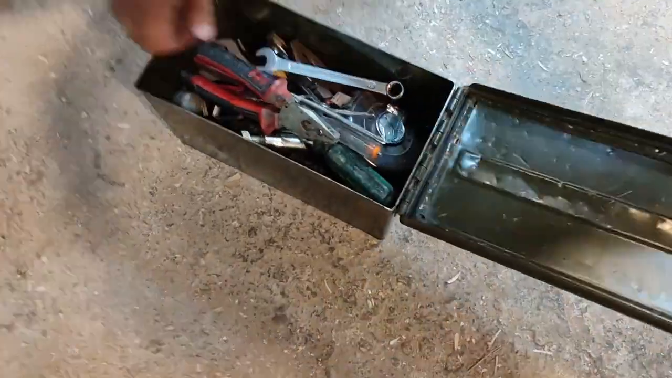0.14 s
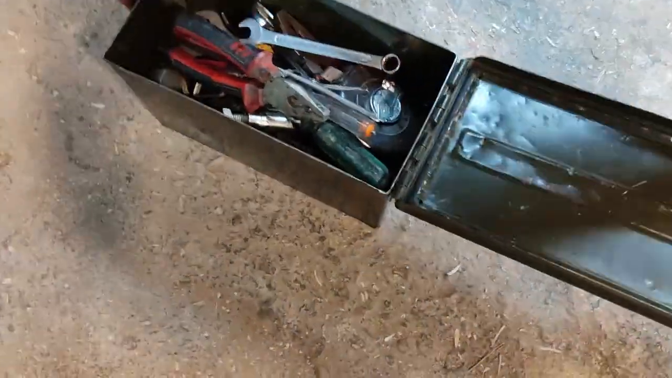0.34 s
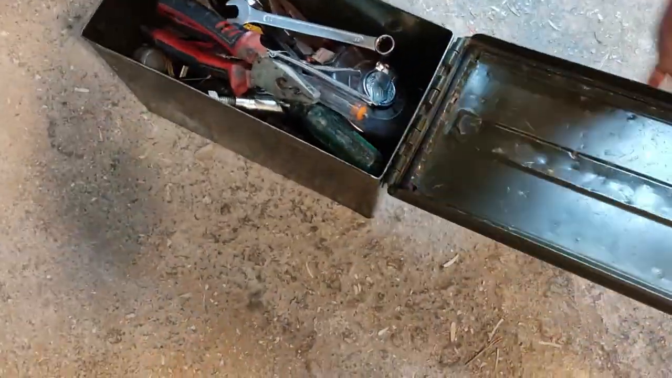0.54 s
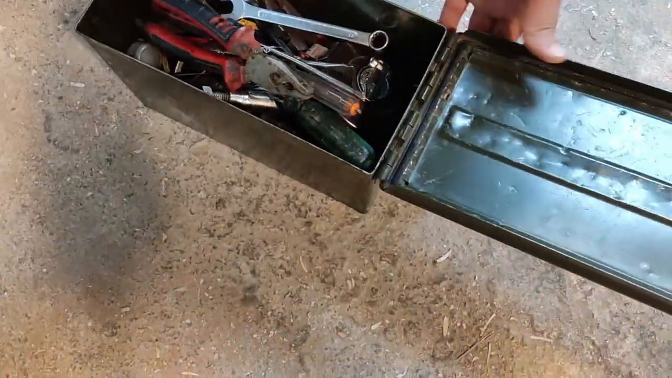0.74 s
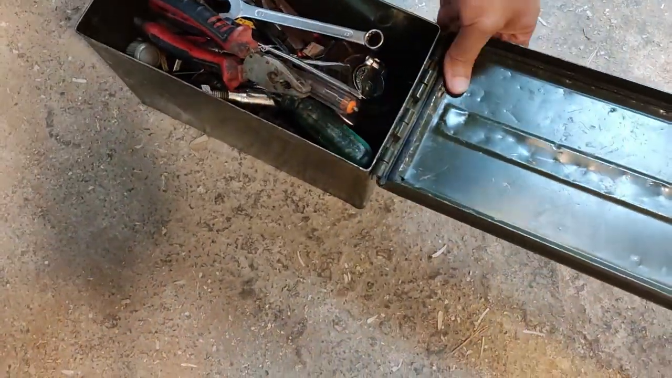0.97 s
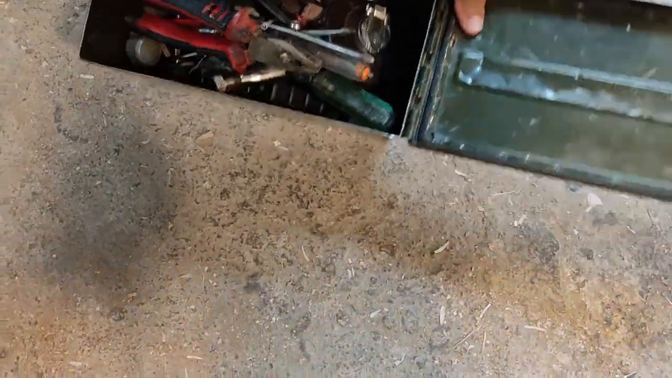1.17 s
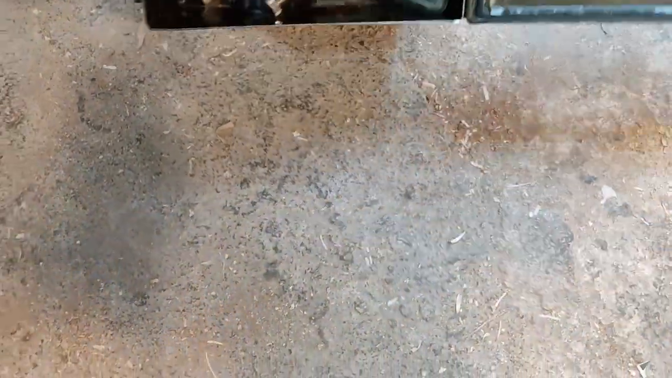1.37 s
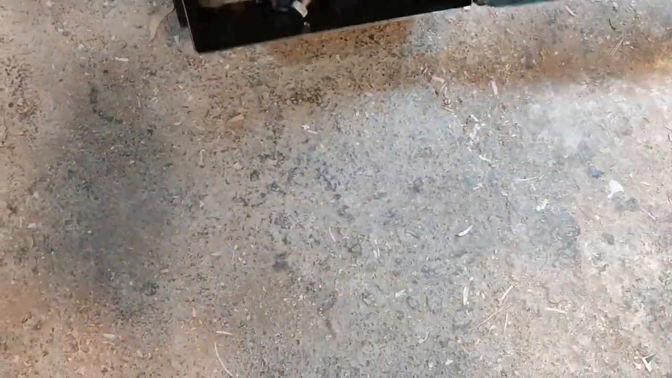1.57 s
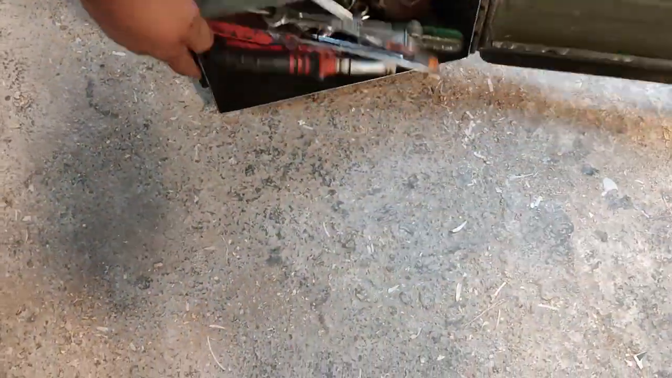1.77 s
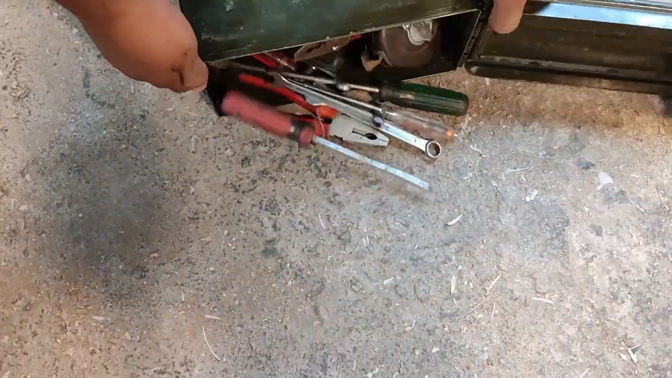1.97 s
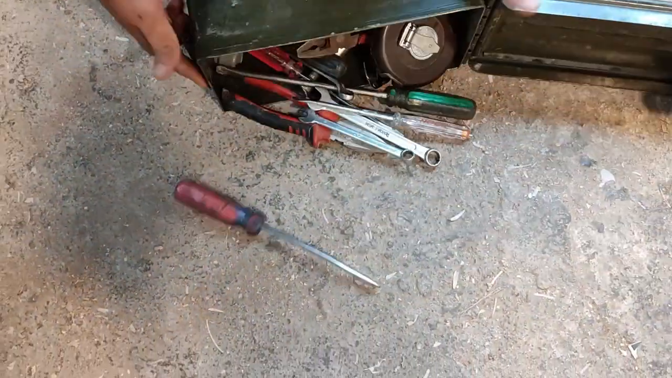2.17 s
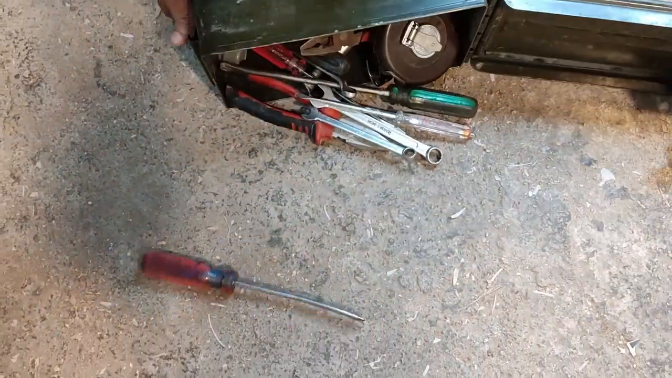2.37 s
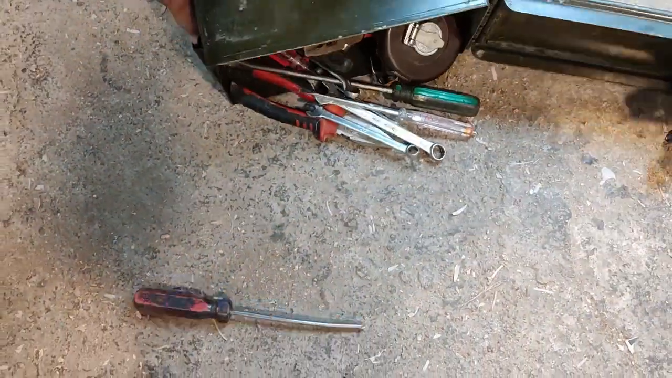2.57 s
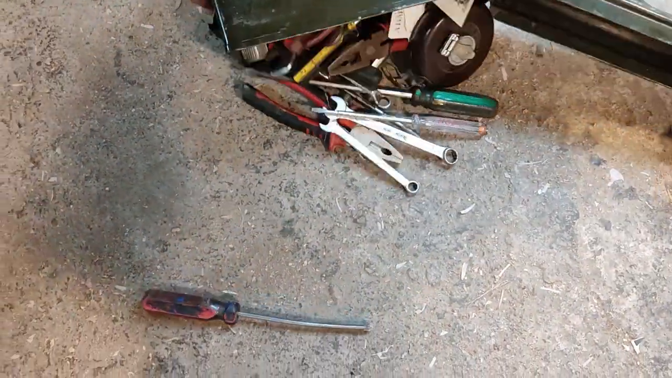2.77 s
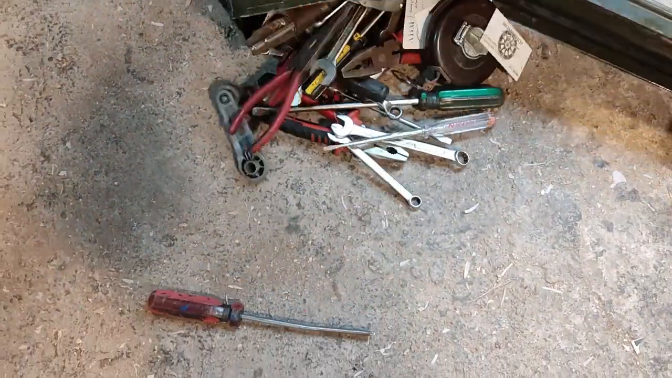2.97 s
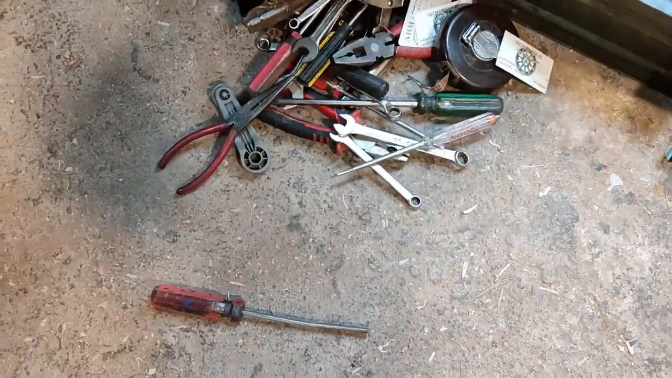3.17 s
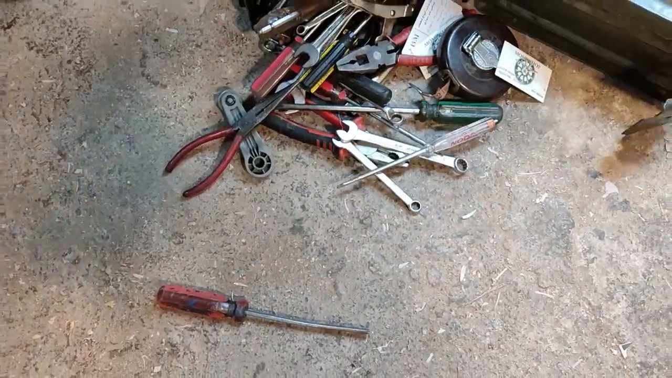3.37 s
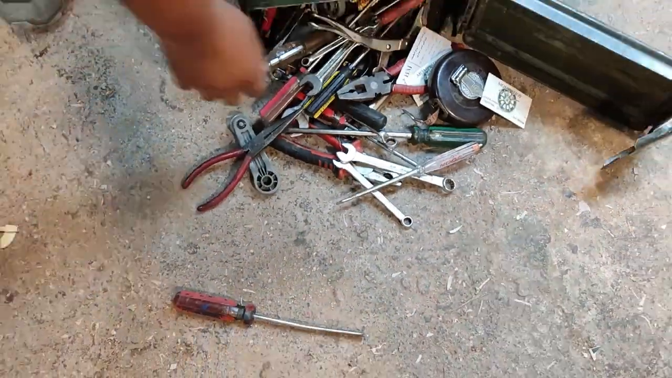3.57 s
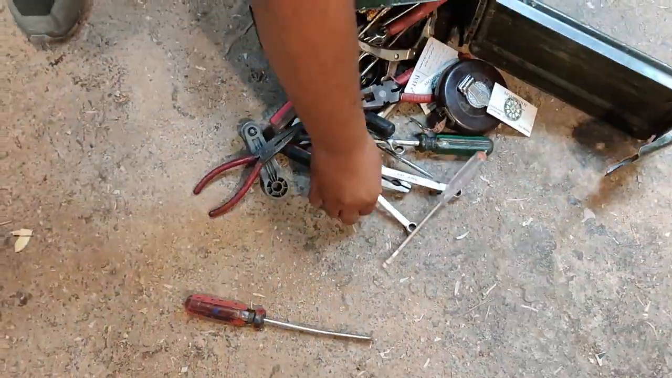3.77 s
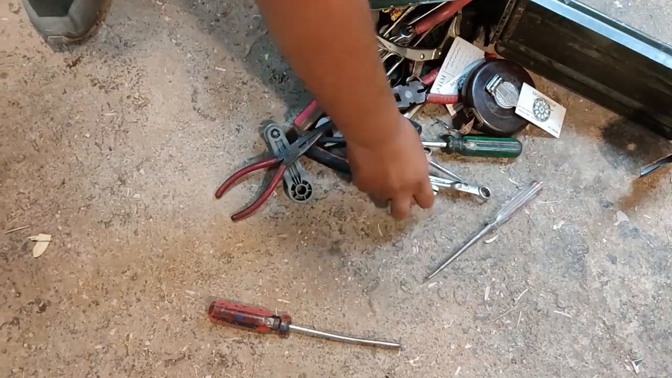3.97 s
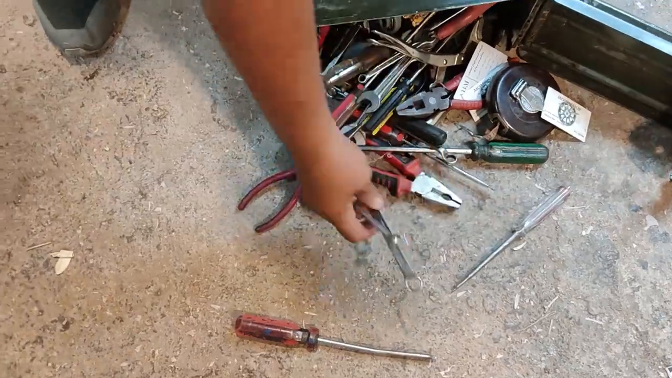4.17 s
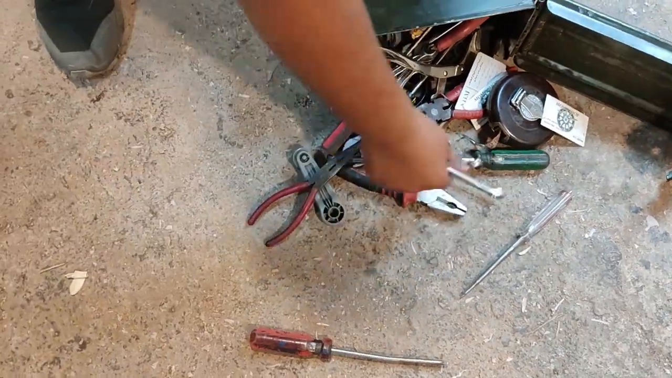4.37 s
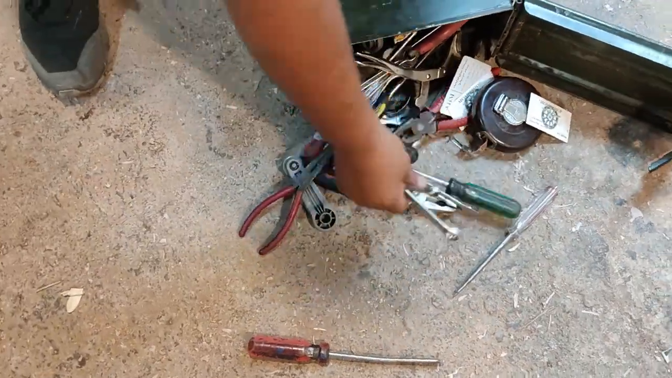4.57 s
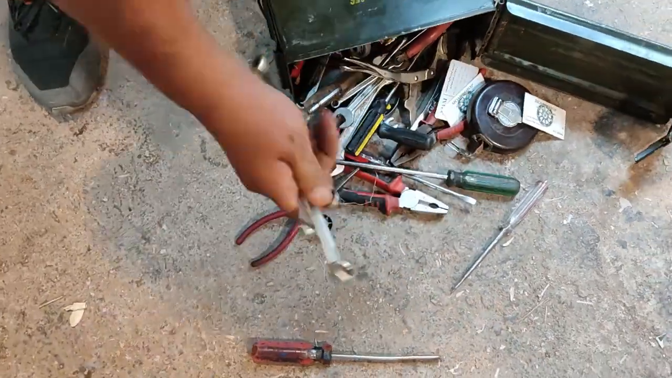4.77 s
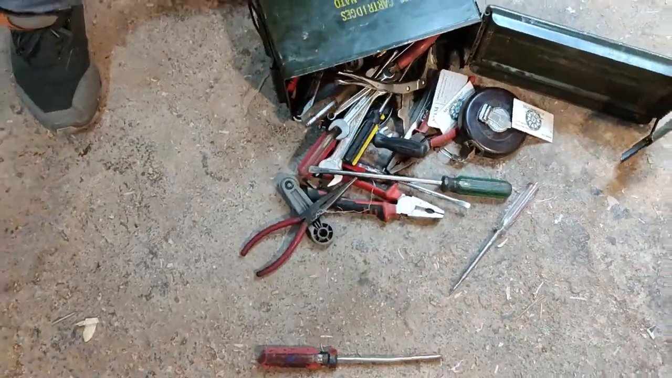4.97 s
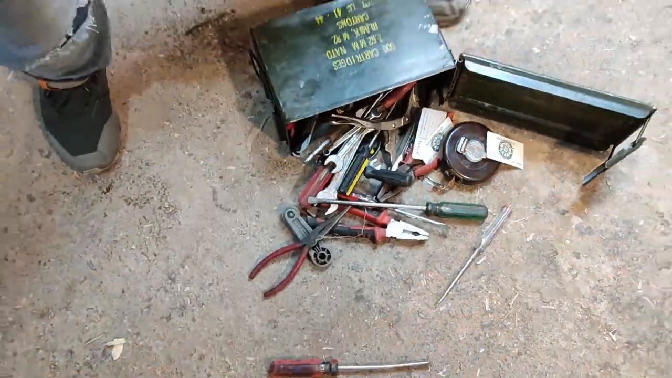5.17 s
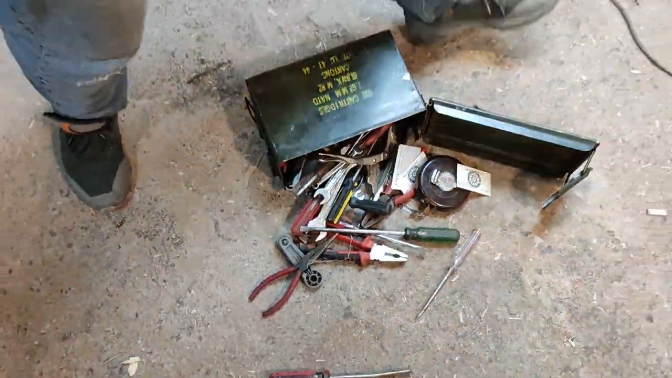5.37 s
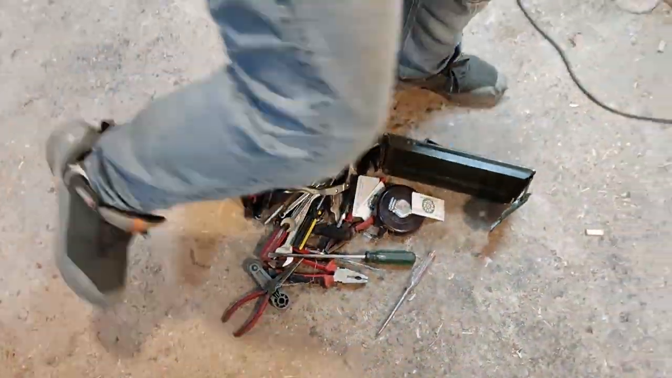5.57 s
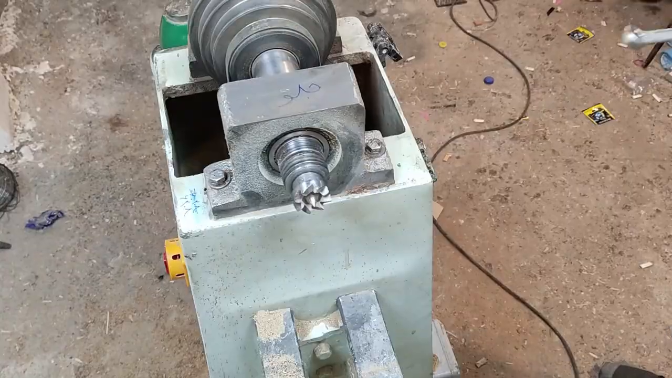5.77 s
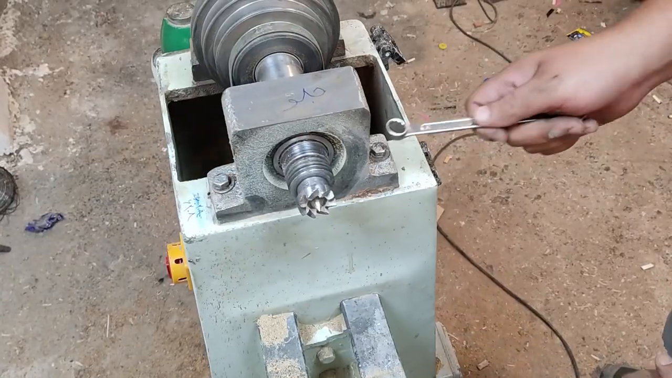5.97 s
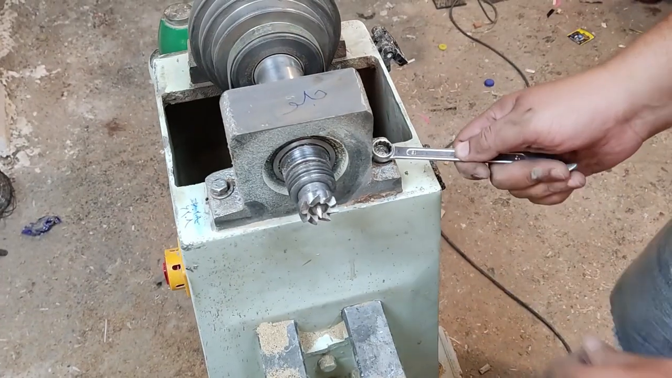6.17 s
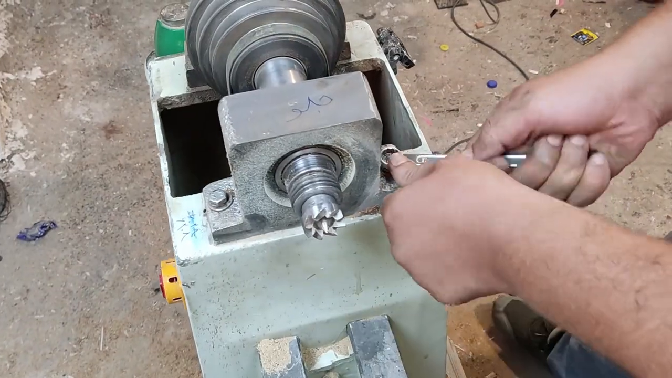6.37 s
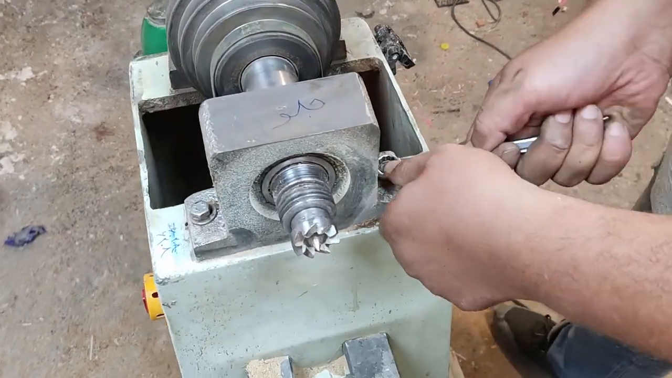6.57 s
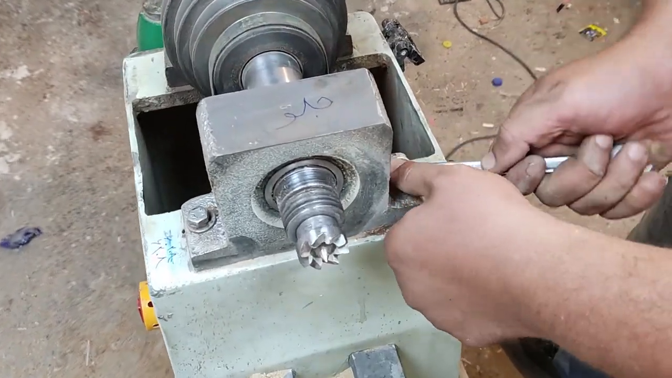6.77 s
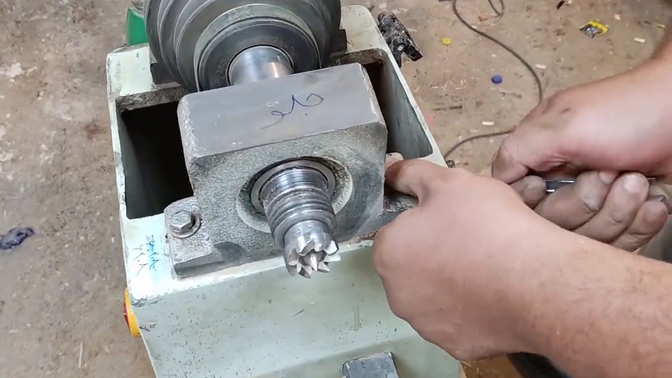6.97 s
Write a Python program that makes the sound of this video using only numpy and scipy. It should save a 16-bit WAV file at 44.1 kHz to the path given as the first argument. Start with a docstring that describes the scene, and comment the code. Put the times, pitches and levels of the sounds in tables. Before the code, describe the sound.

Hand tools are emptied from a sheet-metal box onto a concrete floor, close to the microphone. After a small clank and hollow box bumps comes a loud, dense, high metallic crash, then dull knocks and dragging, a second tumbling burst with low thumps, sparse delicate clinks, a short rummage, and very quiet taps on a machine nut with faint hum.

```python
"""On the concrete floor of a workshop, a steel box of hand tools is tipped out close by.
A spanner drops in, the box is lifted and tilted, wrenches slide out ringing, the rest follows in a heap.
A hand picks through the heap for a spanner, which then taps on a nut of a lathe.
Blows are cracks of noise with dying modes, slides are streams of such blows,
and dull rubbing, hum and air are steady noise and sines."""
import sys
import numpy as np
from scipy import signal
from scipy.fft import rfft, irfft, next_fast_len
from scipy.io import wavfile
from scipy.ndimage import uniform_filter1d

SR = 44100
rng = np.random.default_rng(int(sys.argv[2]) if len(sys.argv) > 2 else 0)


def unload_wav(signal):
    """Save mono or channel-first audio to the path in sys.argv[1] as 16-bit WAV at rate SR, clipped to [-1, 1]."""
    wavfile.write(
        sys.argv[1],
        SR,
        np.round(np.clip(np.atleast_2d(signal).T, -1, 1) * 32767).astype(np.int16),
    )


N = 309582
TIME = np.arange(N) / SR
RING_TIME = TIME[:SR // 2]

# tools jolt together as the box tips (t/s, level/dB)
JOLT = [(1.593, 4.5), (1.607, 12.5), (1.627, 10.5)]
# modes of the jolted tools (f/Hz, level/dB, t60/s)
JOLTED_TOOL_MODES = [(3111, -44, .14), (3757, -40, .15), (4468, -45, .16), (5335, -40, .2),
                     (5385, -38, .24), (6180, -37, .17), (6330, -42, .14), (7267, -36, .2),
                     (8300, -37, .22), (8914, -36, .14), (9679, -36, .16), (11434, -38, .16),
                     (13092, -31, .18), (13770, -44, .16)]
# a wrench hits the lip of the box end first (t/s, level/dB)
END_CLANK = [(1.749, -16)]
# modes that such a blow brings out (f/Hz, level/dB, t60/s)
END_MODES = [(5178, -13, .13), (6384, -17, .12), (6998, -20, .1), (8268, -11, .1), (10895, 0, .22),
             (11810, -10, .14), (11993, -6, .25)]
# another tool falls against the wrenches (t/s, level/dB)
FALLING_TOOL_CLANK = [(1.795, -23)]
# modes of that tool (f/Hz, level/dB, t60/s)
FALLING_TOOL_MODES = [(2885, -11, .12), (3789, -10, .12), (4015, -9, .12), (5351, -8, .14), (6126, 1, .14),
                      (7213, 1, .14), (8494, 0, .12), (9636, 0, .14), (10368, 3, .14), (10658, 0, .12),
                      (12004, 3, .2)]
# large wrenches skid over the concrete (start t/s, rise t/s, fall t/s, force level/dB)
SKID = [(1.76, 0.2, 0.35, 9)]
# the wrenches clank against each other on the way (t/s, level/dB)
WRENCH_CLANKS = [(1.837, 16), (1.864, 10), (1.905, 8), (1.94, 5.5), (1.968, 11), (1.996, 11), (2.036, 18),
                 (2.06, 10.5), (2.1, 3), (2.129, 10), (2.159, 12.5), (2.185, 2.5), (2.222, 7.5)]
# modes of the large wrenches (f/Hz, level/dB, t60/s)
WRENCH_MODES = [(5255, -49, .2), (6153, -57, .2), (6500, -55, .28), (6907, -56, .2), (7214, -57, .14),
                (7893, -39, .28), (8452, -43, .18), (8692, -39, .22), (8807, -49, .18), (9302, -37.5, .17),
                (10348, -44, .14), (10902, -38.5, .22), (11050, -43.5, .26), (11225, -45, .2),
                (11536, -46, .18), (11918, -43, .25), (12009, -44, .22), (12252, -49, .2), (12424, -44, .2),
                (12879, -42, .26), (14131, -45, .09)]
# the last wrench slips free and bounces once (t/s, level/dB)
LAST_BOUNCE = [(2.255, -26.5)]
# modes of the last wrench (f/Hz, level/dB, t60/s)
LAST_WRENCH_MODES = [(5255, -17, .22), (6500, -19, .25), (7892, -4, .24), (8700, -7, .3), (10928, 0, .85),
                     (11048, 1, .27), (11915, -3, .22), (12009, -6, .24), (12890, -9, .22)]
# stereo balance given to the sounds of the box and the spill (f/Hz, left minus right level/dB)
BOX_SIDE = [(300, 1), (4500, -0.5), (7000, -2.5), (9200, -13.5), (10200, 5), (11200, 16), (14000, 2)]


def wrenches():
    """Wrenches skid and clank, their bending modes ringing in the room; the last one rings on without it."""
    ring = ringing(SKID, WRENCH_MODES, per_s=90)
    ring += struck(JOLT, JOLTED_TOOL_MODES, trim_db=0, spread_db=2)
    ring += struck(END_CLANK, END_MODES, trim_db=0, spread_db=1)
    ring += struck(FALLING_TOOL_CLANK, FALLING_TOOL_MODES, trim_db=0, spread_db=1)
    ring += struck(WRENCH_CLANKS, WRENCH_MODES, trim_db=0, spread_db=5)
    heard = room(ring, wet_db=-9, t60=.18)
    heard += struck(LAST_BOUNCE, LAST_WRENCH_MODES, trim_db=0, spread_db=1)
    return tinted(heard, [(5000, 0.29), (14000, -0.66)], BOX_SIDE)


# tools slide down the tilted box in surges (start t/s, rise t/s, fall t/s, level/dB, hardness 0-1)
POUR = [(1.59, 0.027, 0.7, -31.5, 0.53), (1.695, 0.066, 0.38, -43, 1), (1.8, 0.11, 0.13, -28, 0.42),
        (1.95, 0.15, .26, -34.5, 0.82)]
# the tools in the box jingle to rest (start t/s, rise t/s, fall t/s, level/dB, hardness 0-1)
SETTLE = [(0.0036, 0.023, .15, -50.5, 0.91)]
# steel lands on steel inside the box (t/s, level/dB, hardness 0-1)
BOX_BLOWS = [(-0.02, -33.5, 0.7), (0.248, -52, 0.1), (0.4822, -63.5, 0.6), (0.7762, -66, 0.68),
             (1.6065, -25, 0.58), (1.6185, -29.5, .58), (1.6275, -28.5, 0.62), (1.641, -35, .5),
             (1.7205, -39.5, 0.8), (1.7484, -36.5, 0.83), (1.7925, -27.5, 0.5), (1.8365, -29, 0.5),
             (1.879, -30.5, .45), (1.9248, -22, 0.13), (1.939, -26, 0.62), (1.971, -34, 0.7),
             (1.9937, -30.5, 0.67), (2.0334, -39, 0.72), (2.0602, -33, 0.5), (2.1265, -38.5, 0.44)]
# dense ringing of tools within the box (f/Hz, level/dB)
BOX_COLOUR = [(100, -24.5), (220, -7), (340, 3), (600, -3.5), (1250, -5), (2400, -6.5), (3600, -8),
              (4500, -11), (7000, -8.5), (8400, -1), (11200, 0), (13100, -8), (14200, -30.5),
              (15000, -54.5)]


def tools_in_box():
    """Steel strikes steel inside the box, in single blows and in sliding streams of collisions."""
    sound = blows(BOX_BLOWS, BOX_COLOUR, BOX_SIDE, trim_db=[8, -11, 1], t60=.26, crack_db=10, crack_s=.0043)
    sound += clatter(SETTLE, BOX_COLOUR, BOX_SIDE, trim_db=[0, -8, 0], per_s=560,
                     t60=.15, crack_db=-.5, crack_s=.00076, count=2)
    return sound + clatter(POUR, BOX_COLOUR, BOX_SIDE, trim_db=[-1, -3.5, -2], per_s=110,
                           t60=.17, crack_db=9, crack_s=.0012, count=6)


# tools strike the heap (t/s, level/dB, hardness 0-1)
HEAP_BLOWS = [(2.6843, -38, 0.56), (2.7365, -30, 0.57), (2.752, -23, 0.24), (2.776, -32, 0.65),
              (2.7875, -24, 0.21), (2.8125, -21.5, 0.38), (2.829, -23.5, 0.34), (2.857, -28, 0.2),
              (2.8824, -26.5, 0.3), (2.898, -29.5, 0.45), (2.9364, -25.5, 0.33), (2.9562, -26, 0.51),
              (3.0445, -45, 0.66), (3.0949, -46.5, 1), (3.14, -45.5, 0.65), (3.3225, -25, 0.16),
              (3.327, -23.5, 0.54), (3.3354, -25.5, 0.08), (3.4047, -44, 0.54)]
# modes of the heavy tools in the heap (f/Hz, level/dB, t60/s)
HEAP_MODES = [(585, -4, .14), (660, -1, .18), (706, 2, .2), (775, 0, .18), (813, -3, .2), (2649, -4, .13),
              (3085, 2, .11), (3171, 1, .12), (3278, 0, .11), (3542, 2.5, .11), (3747, -1, .1),
              (5318, -2, .12), (6136, -2, .1), (11649, 0, .12)]
# the rest of the tools tumble onto the heap (start t/s, rise t/s, fall t/s, level/dB, hardness 0-1)
TUMBLE = [(2.7, 0.086, 0.33, -32.5, 0.6), (3.05, 0.049, 0.044, -46, 0.82), (3.16, 0.027, 0.06, -39, 0.53)]
# a last heavy tool drops flat on the floor (t/s, level/dB)
LAST_FALL = [(3.326, -29.5)]
# modes of that heavy tool (f/Hz, level/dB, t60/s)
HEAVY_TOOL_MODES = [(807, 3, .2), (1120, 2, .17), (1455, 1, .17), (1997, -4, .16), (2514, -2, .13),
                    (2870, 0, .14), (3698, -2, .11), (4172, -2, .1), (7267, -2, .1), (12424, 2, .1)]
# dense ringing of tools out in the open (f/Hz, level/dB)
OPEN_COLOUR = [(120, -53), (350, -26), (540, -8), (740, -3), (1020, -12.5), (1300, -11), (1900, -15),
               (3200, -8.5), (4800, -12), (7500, -10), (10000, -10.5), (13000, -8.5), (15600, -9),
               (16300, -43)]
# stereo balance out in the open (f/Hz, left minus right level/dB)
OPEN_SIDE = [(200, -2.5), (700, 1.5), (4000, 0), (8000, 0), (12000, -2), (16000, 0.5)]


def heap():
    """Tools land in a heap: noisy blows and tumbling excite dense ringing over the heavy tools' modes."""
    sound = blows(HEAP_BLOWS, OPEN_COLOUR, OPEN_SIDE, trim_db=[0, -6, -2],
                  t60=.16, crack_db=10.5, crack_s=.0018)
    sound += struck(HEAP_BLOWS, HEAP_MODES, trim_db=-10, spread_db=2.5)
    sound += struck(LAST_FALL, HEAVY_TOOL_MODES, trim_db=0, spread_db=1)
    return sound + clatter(TUMBLE, OPEN_COLOUR, OPEN_SIDE, trim_db=[0, -2, .5], per_s=400,
                           t60=.16, crack_db=9, crack_s=.0012)


# the full box is lifted and set down on its edge (t/s, level/dB, hardness 0-1)
BOX_BUMPS = [(1.1275, -35.5, 0.36), (1.1536, -32, 0.44), (1.1785, -26, 0.5), (1.2263, -47, 0),
             (1.5914, -24.5, 0.65)]
# hollow modes of the box walls (f/Hz, level/dB, t60/s)
BOX_WALL_MODES = [(226, -6, .22), (275, -2, .2), (345, 11, .07), (392, 0, .16), (446, -3, .38),
                  (587, -4, .29), (694, -7, .25), (781, -13, .27), (824, -8, .2), (1150, -8, .13),
                  (1655, -6, .12)]
# the hollow box booms on after it is set down (t/s, level/dB, hardness 0-1)
BOOMS = [(1.181, -34, 0.47), (1.594, -36.5, 0.5)]
# spectrum of the boom (f/Hz, level/dB)
BOOM_COLOUR = [(120, -15.5), (220, 0), (330, -2), (440, 3.5), (505, -14), (580, 3), (690, -3.5),
               (830, -9.5), (1100, -16), (3000, -47.5)]
# light taps on the open lid (t/s, level/dB)
LID_TAPS = [(0.249, -46), (0.748, -58), (1.028, -50)]
# modes of the lid (f/Hz, level/dB, t60/s)
LID_MODES = [(1050, 0, .11), (1130, -5, .08)]
# the emptying box thumps on the floor (t/s, level/dB)
BOX_THUMPS = [(3.068, -39), (3.228, -32)]
# lowest box modes, damped by the hands (f/Hz, level/dB, t60/s)
GRIPPED_BOX_MODES = [(129, -6, .14), (205, 0, .13), (262, -2, .1), (335, -7, .08)]


def box_body():
    """The sheet-steel walls and lid ring hollow when the box is bumped, set down or thumped."""
    sound = blows(BOX_BUMPS, BOX_COLOUR, BOX_SIDE, trim_db=[2, -4, 0], t60=.22, crack_db=2, crack_s=.0039)
    sound += struck(BOX_BUMPS, BOX_WALL_MODES, trim_db=-4, spread_db=2)
    sound += blows(BOOMS, BOOM_COLOUR, OPEN_SIDE, trim_db=[-60, 0, -22], t60=.32, crack_db=-6, crack_s=.003)
    sound += struck(LID_TAPS, LID_MODES, trim_db=0, spread_db=2)
    return sound + struck(BOX_THUMPS, GRIPPED_BOX_MODES, trim_db=0, spread_db=2)


# a spanner dropped into the box bounces to rest (t/s, level/dB, hardness 0-1)
DROP = [(0.2935, -37, 0.55), (0.299, -38, 0.4), (0.3082, -30, 0.68), (0.32, -33, 0.45)]
# its bending modes, damped by the tools it lands on (f/Hz, level/dB, t60/s)
DROPPED_SPANNER_MODES = [(800, -5, .1), (1230, 2, .08), (1916, -5, .05), (3430, -1, .09), (3980, -1, .11),
                         (4748, -3, .08), (5081, -1, .1), (5426, -5, .06), (5900, 0, .09), (7202, 1, .1),
                         (8450, 6, .18), (9291, 6, .14), (11100, 11, .14), (13092, 7, .08),
                         (14244, -7, .06)]


def dropped_spanner():
    """A spanner bounces among the tools: sharp cracks plus its damped bending modes."""
    sound = blows(DROP, BOX_COLOUR, BOX_SIDE, trim_db=[7, -11, -2], t60=.26, crack_db=22, crack_s=.0012)
    return sound + struck(DROP, DROPPED_SPANNER_MODES, trim_db=-2, spread_db=3)


# tools knock against the lip of the box (t/s, level/dB, hardness 0-1)
LIP_KNOCKS = [(2.4712, -36, 0.26), (2.5266, -39, 0.74), (2.5863, -30, 0.71), (2.606, -34.5, 0.63),
              (2.6222, -35, 0.56)]
# spectrum of the knocks on the lip (f/Hz, level/dB)
LIP_COLOUR = [(200, -1), (600, -11), (2000, 0.5), (3200, -9), (5000, -5), (5750, 3), (6600, -13),
              (8500, -1.5), (10000, 2.5), (11800, -15), (13000, -13), (14500, -41)]


def lip_knocks():
    """Tools knock on the lip of the box, with a short dense ring."""
    return blows(LIP_KNOCKS, LIP_COLOUR, OPEN_SIDE, trim_db=[-3, -6, 0],
                 t60=.087, crack_db=15, crack_s=.0022)


# a screwdriver handle bounces on the concrete (t/s, level/dB, hardness 0-1)
HANDLE_KNOCKS = [(2.27, -36, 0.46), (2.3111, -34.5, 0.59), (2.3615, -47, 0), (2.4158, -48, 0.82),
                 (2.4478, -40, 0.3), (2.4707, -35, 0.5)]
# the screwdriver rolls (start t/s, rise t/s, fall t/s, level/dB, hardness 0-1)
ROLL = [(2.1, 0.21, 0.2, -41, 0.5), (2.46, 0.04, 0.32, -42, 0.98)]
# spectrum of the handle on concrete (f/Hz, level/dB)
HANDLE_COLOUR = [(150, -6), (350, -5.5), (650, 9), (1000, -6), (1600, -3), (2400, -10), (3500, -19.5),
                 (6000, -31), (12000, -37.5), (15000, -58.5)]


def screwdriver():
    """A screwdriver bounces on its handle and rolls over the concrete in a stream of dull contacts."""
    knocks = blows(HANDLE_KNOCKS, HANDLE_COLOUR, OPEN_SIDE, trim_db=[-14, 0, 0],
                   t60=.13, crack_db=18, crack_s=.002)
    return knocks + clatter(ROLL, HANDLE_COLOUR, OPEN_SIDE, trim_db=[-22, 0, -3], per_s=150,
                            t60=.1, crack_db=12, crack_s=.002, count=4)


# a hand stirs the heap (start t/s, rise t/s, fall t/s, level/dB, hardness 0-1)
RUMMAGE = [(4.53, 0.065, 0.1, -42.5, 0.62), (4.64, 0.052, 0.07, -34, 0.62),
           (4.735, 0.059, 0.057, -35.5, 0.65)]
# the searching hand knocks tools together (t/s, level/dB, hardness 0-1)
HAND_KNOCKS = [(4.5361, -40.5, 0.66), (4.557, -42, 0.57), (4.5826, -43, 0.5), (4.614, -49.5, 0.85),
               (4.6569, -35, 0.3), (4.68, -35.5, 0.1), (4.6967, -45, 0.8), (4.747, -35.5, 0.58),
               (4.759, -28, 0.57), (4.775, -39, 0.92), (4.788, -39, 0.85), (4.822, -38, 0.75)]
# spectrum of the stirred tools (f/Hz, level/dB)
RUMMAGE_COLOUR = [(250, -17), (410, 8.5), (560, 4.5), (850, 7.5), (1300, -1), (2100, 8.5), (4500, 2.5),
                  (6000, -9.5), (9000, -13), (12500, -9), (14500, 0.5), (15600, -10), (16300, -28)]
# low modes of the heap under the hand (f/Hz, level/dB, t60/s)
STIRRED_HEAP_MODES = [(410, 0, .1), (465, -3, .08), (590, -3, .07), (720, 0, .08)]


def rummaging():
    """A hand stirs the heap: short-lived clatter and knocks above low modes of the heap."""
    sound = clatter(RUMMAGE, RUMMAGE_COLOUR, OPEN_SIDE, trim_db=[2, -7, 0], per_s=280,
                    t60=.085, crack_db=18.5, crack_s=.00063)
    sound += blows(HAND_KNOCKS, RUMMAGE_COLOUR, OPEN_SIDE, trim_db=[0, -5, 0],
                   t60=.072, crack_db=10, crack_s=.001)
    return sound + struck(HAND_KNOCKS, STIRRED_HEAP_MODES, trim_db=-12, spread_db=0)


# a slim spanner is pulled free and chatters (start t/s, rise t/s, fall t/s, force level/dB)
PULL = [(4.762, 0.038, 0.05, 2.5)]
# modes of the slim spanner (f/Hz, level/dB, t60/s)
SLIM_MODES = [(3074, -53, .11), (5125, -54, .09), (6035, -48, .14), (11670, -47, .09), (14351, -27, .1)]


def slim_spanner():
    """A slim spanner chatters as it is pulled free, its modes leaning to the right."""
    return ringing(PULL, SLIM_MODES, per_s=210) * amp([[-1], [3]])


# light touches of a spanner (t/s, level/dB, crack above the ring level/dB, extra below 5 kHz level/dB)
CLINKS = [(3.804, -29, -1, 13), (3.858, -37, 20, 20), (3.903, -25, 19, 14.5), (3.947, -13, 25, 7.5),
          (3.993, -28, 5, 14.5), (4.12, -22.5, 17, 13.5), (4.1461, -15, 11, 3), (4.242, -20, 21, 3),
          (4.2884, -16.5, 20, -4), (4.349, -16, 17, 2), (4.354, -18, 22, -11), (4.857, -17, 24, 2),
          (4.874, -19, 31, -9), (4.881, -21, 24, -15), (4.894, -17.5, 27, -7), (4.945, -28.5, 7, 0),
          (5.158, -33, 16, 4), (5.2093, -27, 11, -4), (5.296, -18.5, 19, -1), (5.378, -19, -2, 1),
          (5.392, -11.5, -4, -5)]
# spectrum of the touches (f/Hz, level/dB)
CLINK_COLOUR = [(600, -17.5), (3000, -19.5), (4800, -17.5), (5500, -10), (6100, -11), (6700, -3.5),
                (7700, -12.5), (9300, -7.5), (10500, -5), (11500, 10.5), (12900, -2.5), (14400, 4),
                (15600, 8.5), (16300, 5.5)]
# modes of the spanner held in the fingers (f/Hz, level/dB, t60/s)
HELD_SPANNER_MODES = [(5749, -14, .08), (6675, -3, .11), (11380, 1, .1), (14265, -1, .09), (15546, -5, .07)]
# a spanner scrapes as it is picked up (start t/s, rise t/s, fall t/s, level/dB, hardness 0-1)
PICK_UP = [(3.84, 0.066, .06, -53.5, 0.57)]


def held_spanner():
    """A spanner clinks and scrapes on its neighbours; the fingers damp and widen its modes."""
    sound = struck(CLINKS, HELD_SPANNER_MODES, trim_db=-33, spread_db=3)
    for s, level_db, crack_db, clank_db in CLINKS:
        touch = impact(CLINK_COLOUR, OPEN_SIDE, t60=.13, crack_db=crack_db, crack_s=.00096)
        touch = tinted(touch, [(5000, clank_db), (9000, 0)], [(1000, 0)])
        add(sound, s, amp(level_db - 15.5) * touch / rms(touch[:, :SR // 100]))  # level over the first 10 ms
    return sound + clatter(PICK_UP, CLINK_COLOUR, OPEN_SIDE, trim_db=[0, -10, 0], per_s=800,
                           t60=.084, crack_db=10, crack_s=.00091, count=3)


# the spanner meets the nut of the lathe (t/s, level/dB, hardness 0-1)
NUT_TAPS = [(5.794, -64, 0.6), (5.89, -66.5, 0.53), (6.0656, -45, 0.79), (6.0902, -49, 0.45),
            (6.5974, -61, 0), (6.9267, -66, 0.4), (7.0011, -41.5, 0.2)]
# spectrum of the taps (f/Hz, level/dB)
NUT_COLOUR = [(500, -29), (1500, -15), (3300, -21), (4400, -11), (6000, 0.5), (6900, -11), (7800, -7),
              (9000, 0), (9600, 7), (10800, 5), (12200, -18), (13100, 3), (13900, -4), (14700, 5),
              (15500, 9), (16300, -20.5)]
# modes of the spanner against the nut (f/Hz, level/dB, t60/s)
SPANNER_ON_NUT_MODES = [(5921, -8, .14), (6416, -11, .1), (7848, -10, .1), (9485, 1, .14), (9959, 0, .14),
                        (14642, -4, .1), (15428, 0, .1)]


def nut_taps():
    """The spanner taps on the nut: a bright noisy ring plus a few high modes."""
    sound = blows(NUT_TAPS, NUT_COLOUR, OPEN_SIDE, trim_db=[5, -16, 0], t60=.14, crack_db=11, crack_s=.003)
    return sound + struck(NUT_TAPS, SPANNER_ON_NUT_MODES, trim_db=-11, spread_db=2)


# the box drags on the floor in shoves (start t/s, rise t/s, fall t/s, level/dB)
DRAG = [(2.23, 0.085, 0.26, -40.5), (2.33, 0.276, 0.045, -38)]
# spectrum of the drag (f/Hz, level/dB)
DRAG_COLOUR = [(20, -20), (55, -13), (76, -1), (98, 8.5), (130, -8.5), (230, -11.5), (400, -28),
               (1000, -81)]
# the box rumbles as it is shaken empty (start t/s, rise t/s, fall t/s, level/dB)
BUMPS = [(3.0, 0.11, 0.078, -40.5), (3.17, 0.066, 0.028, -36.5), (3.26, 0.018, 0.15, -42)]
# spectrum of the rumble (f/Hz, level/dB)
BUMP_COLOUR = [(15, -17), (31, 16), (55, -11), (85, 7.5), (128, -0.5), (215, 4.5), (400, -6.5), (1000, -20)]
# the heap shifts dully under the searching hand (start t/s, rise t/s, fall t/s, level/dB)
NUDGES = [(4.1, 0.016, 0.16, -48), (4.58, 0.11, 0.055, -47.5)]
# spectrum of the shifting heap (f/Hz, level/dB)
NUDGE_COLOUR = [(120, -6), (220, -6), (330, -25), (415, 2), (490, -15), (900, -43)]
# a short dry scuff beside the lathe (start t/s, rise t/s, fall t/s, level/dB)
SCUFF = [(6.345, 0.044, 0.044, -59.5)]
# spectrum of the scuff (f/Hz, level/dB)
SCUFF_COLOUR = [(800, -33), (1450, -3), (1800, 1), (2100, -15), (3000, -35)]


def shifting():
    """Box, heap and a scuff rub on rough surfaces: coloured noise that swells with each movement."""
    sound = rubbing(DRAG, DRAG_COLOUR) + rubbing(BUMPS, BUMP_COLOUR)
    return sound + rubbing(NUDGES, NUDGE_COLOUR) + rubbing(SCUFF, SCUFF_COLOUR)


# spectrum of the workshop air at the box (f/Hz, relative level/dB)
AIR_BOX = [(12, -43.5), (20, -7), (53, -9.5), (96, -4.5), (216, -13), (255, -13), (367, -13.5), (698, -24),
           (802, -22.5), (873, -27), (5080, -36), (10800, -31.5), (16000, -54)]
# the same by the heap (f/Hz, relative level/dB)
AIR_HEAP = [(12, -38), (20, 6), (91, -12.5), (123, -3.5), (204, 2), (337, -9), (527, -11), (738, -17.5),
            (802, -17), (3070, -31), (4420, -31), (11800, -37), (16000, -38)]
# the same at the lathe (f/Hz, relative level/dB)
AIR_LATHE = [(12, -32), (20, 10.5), (43, -16.5), (79, -0.5), (142, -25), (168, -10.5), (262, -12),
             (434, -9), (472, -11.5), (558, -15.5), (660, -16.5), (2990, -29.5), (16000, -37)]
# hum of far machines at the box (f/Hz, rms level/dB)
HUM_BOX = [(97, -61.5)]
# hum at the lathe (f/Hz, rms level/dB)
HUM_LATHE = [(75.4, -67), (436.0, -64.5), (543.7, -68), (619.1, -70)]


def workshop():
    """Steady air noise and far hum at three spots: the box, the heap and the lathe."""
    air = background(0, 2.9, AIR_BOX, level_db=-54, hum=HUM_BOX)
    air += background(2.63, 5.8, AIR_HEAP, level_db=-49.5, hum=[])
    return air + background(5.8, 8, AIR_LATHE, level_db=-53, hum=HUM_LATHE)


def background(start, end, colour, level_db, hum):
    """Workshop air as noise and the hum of far machines as sines, at one spot."""
    lines = 0
    for hz, db in hum:
        lines = lines + np.sqrt(2) * amp(db) * np.sin(2 * np.pi * (hz * TIME + rng.random()))
    present = uniform_filter1d(1. * ((TIME >= start) & (TIME < end)), size=400)
    return (amp(level_db) * murmur(colour) + lines) * present


def rubbing(rows, colour):
    """The dull sound of something shifting against a rough surface."""
    return murmur(colour) * sum(swell(*row) for row in rows)


def murmur(colour):
    """Steady noise of a given spectrum, with a mono rms of 1."""
    size = next_fast_len(N)
    gain = amp(read(colour, np.fft.rfftfreq(size, 1 / SR)))
    x = irfft(rfft(noise_pair(size)) * gain)[:, :N]
    return x / rms(x.mean(0))


def blows(rows, colour, side, trim_db, t60, crack_db, crack_s):
    """Single hard blows, each on a different spot and so with its own ring."""
    out = np.zeros((2, N))
    for s, level_db, hardness in rows:
        levels_db = level_db + tilt(hardness) + trim_db
        for part, db in zip(bands(impact(colour, side, t60, crack_db, crack_s)), levels_db):
            add(out, s, amp(db) * part / rms(part[:, :SR // 100]))  # level over the first 10 ms
    return out


def clatter(rows, colour, side, trim_db, per_s, t60, crack_db, crack_s, count=12):
    """A stream of collisions in surges; one tool rattles for a moment, then another takes over."""
    forces = sum(np.outer(amp(tilt(hardness) + trim_db), swell(*surge)) for *surge, hardness in rows)
    span = lasting(forces[0])
    clicks = contacts(per_s)[span]
    tool = np.repeat(rng.integers(0, count, N // 600), 600)[span]  # a new draw every 600 samples
    out = np.zeros((2, N))
    for k in range(count):
        own_clicks = clicks * (tool == k)
        for part, force in zip(bands(impact(colour, side, t60, crack_db, crack_s)), forces):
            add(out, span.start / SR, convolve(own_clicks * force[span], part / np.linalg.norm(part[0])))
    return out


def ringing(rows, modes, per_s, count=4):
    """Loose tools chatter along, each with its own contacts, which top up its bending modes."""
    force = sum(swell(*row) for row in rows)
    span = lasting(force)
    drives = [(force * contacts(per_s))[span] for _ in range(count)]
    out = np.zeros((2, N))
    for k, (hz, db, t60) in enumerate(modes):
        ring = convolve(drives[k % count], mode(hz, t60, TIME[:SR]))
        add(out, span.start / SR, amp(db) * ring * np.linalg.norm(force) / np.linalg.norm(ring[0]))
    return out


DETUNE = .002  # a tool's pitch shifts by up to this share with the way it lies on the others


def struck(rows, modes, trim_db, spread_db):
    """Blows on one object: the same modes up to a slight detune, in shares that vary with the spot hit."""
    out = np.zeros((2, N))
    for s, level_db, *_ in rows:
        shares_db = spread_db * rng.uniform(-1, 1, len(modes))
        shift = 1 + DETUNE * rng.uniform(-1, 1)
        ring = 0
        for (hz, db, t60), share_db in zip(modes, shares_db):
            ring = ring + amp(db + share_db) * mode(hz * shift, t60, RING_TIME)
        add(out, s, amp(level_db + trim_db) * ring)
    return out


def impact(colour, side, t60, crack_db, crack_s):
    """One contact: a crack, then the dying ring of its own random set of modes."""
    t = RING_TIME[:2 ** 14]
    crack = amp(crack_db) * np.exp(-t / crack_s) * noise_pair(len(t))
    ring = amp(-60 * t / max(t60, .01)) * tool_ring(len(t))
    rise = 1 - np.exp(-t / .001)
    return tinted(rise * (crack + ring), colour, side)


# share of a tool's ring that lies in a few clear tones (f/Hz, share 0-1)
TONAL_SHARE = [(1500, 0), (3500, .35), (16000, .45)]
MODE_SPACING_HZ, TONE_SPACING_HZ, UNEVEN_ABOVE_HZ = 110, 190, 3000


def tool_ring(size):
    """The undamped ring of some tool: a few clear tones among uneven clusters of dense modes."""
    hz = np.fft.rfftfreq(size, 1 / SR)
    grid = np.arange(0, SR / 2, MODE_SPACING_HZ)
    clusters_db = 6 * np.interp(hz, grid, np.clip(rng.standard_normal(len(grid)), -2, 2))
    clusters_db *= np.minimum(hz / UNEVEN_ABOVE_HZ, 1)  # smoother towards the bass
    share = read(TONAL_SHARE, hz)
    chance = hz[1] / TONE_SPACING_HZ
    power = 1 - share + share * (rng.random(len(hz)) < chance) / chance
    return irfft(rfft(noise_pair(size)) * np.sqrt(power) * amp(clusters_db), size)


def mode(hz, t60, t):
    """A dying sine that builds up during the contact; left and right phases differ more the higher it is."""
    rise = 1 - np.exp(-(t / .0007) ** 2)
    phase = rng.random() + min(hz / 4000, 1) * rng.random((2, 1))
    return rise * np.exp(-np.log(1000) * t / t60) * np.sin(2 * np.pi * (hz * t + phase))


def contacts(per_s):
    """Random collisions, many small and a few large, of even power."""
    size = amp(5 * np.minimum(rng.exponential(1, N), 3)) * rng.choice([-1, 1], N)
    clicks = size * (rng.random(N) < per_s / SR)
    power = abs(uniform_filter1d(clicks ** 2, size=1500)) + 1e-6
    return clicks / np.sqrt(power)


SWELL_DB = 20.5  # a slide or shove starts and ends this far under its crest


def swell(start, rise, fall, db):
    """Gain of one movement: it gathers, rounds over its crest and dies away."""
    from_crest = np.interp(TIME - start, np.cumsum([0, rise, fall]), [1, 0, 1])
    return amp(db - SWELL_DB * from_crest ** 2) * (from_crest < 1)


def lasting(force):
    """The samples from the start of the first movement to the end of the last."""
    return slice(*np.flatnonzero(force)[[0, -1]])


# a harder contact is shorter: change from softest to hardest (jingle, thud and clank level/dB)
HARDER_DB = [36, -18.5, 1]


def tilt(hardness):
    """Jingle, thud and clank in dB: hard contacts jingle, soft ones thud."""
    return (np.clip(hardness, 0, 1) - .5) * np.array(HARDER_DB)


# pass bands of jingle, thud and clank, one row each (low f/Hz, high f/Hz)
BANDS_HZ = [(6500, 20000), (60, 1000), (1000, 6500)]


def bands(sound):
    """Splits a sound into jingle, thud and clank."""
    filters = [signal.butter(3, band, "bandpass", fs=SR, output="sos") for band in BANDS_HZ]
    return [signal.sosfilt(sos, sound) for sos in filters]


def tinted(x, colour, side):
    """Causal (minimum-phase) colouring, so that nothing sounds before the blow."""
    hz = abs(np.fft.fftfreq(x.shape[1], 1 / SR))
    log_gain = np.log(amp(read(colour, hz) + np.outer([.5, -.5], read(side, hz))))
    return np.fft.ifft(np.fft.fft(x) * np.exp(np.conj(signal.hilbert(log_gain)))).real


def room(x, wet_db, t60):
    """Adds the diffuse tail of the workshop as decaying noise."""
    tail = noise_pair(len(RING_TIME)) * np.exp(-np.log(1000) * RING_TIME / t60) * (RING_TIME > .004)
    return x + amp(wet_db) * convolve(x, tail / np.linalg.norm(tail[0]))


# likeness of left and right noise (f/Hz, correlation 0-1)
LIKENESS = [(100, 0.92), (600, 0.89), (1500, 0.21), (4000, 0.15), (8000, 0.018)]


def noise_pair(size):
    """Left and right noise, alike in the bass."""
    a, b = rfft(rng.standard_normal((2, size)))
    same = np.clip(read(LIKENESS, np.fft.rfftfreq(size, 1 / SR)), -1, 1)
    return irfft(np.array([a, same * a + np.sqrt(1 - same ** 2) * b]), size)


def convolve(x, response):
    """Plays x through a stereo response."""
    return signal.fftconvolve(np.atleast_2d(x), response, axes=1)[:, :N]


def add(mix, s, sound):
    """Mixes a stereo sound in at time s; of one begun before zero only the tail is heard."""
    at = round(s * SR)
    sound = sound[:, max(-at, 0):]
    part = mix[:, max(at, 0):][:, :sound.shape[1]]
    part += sound[:, :part.shape[1]]


def read(points, hz):
    """A table of (f/Hz, value) joined on a log-frequency axis."""
    f, value = np.transpose(points)
    return np.interp(np.log(hz + 1), np.log(f + 1), value)


def amp(db):
    """Decibels to gain."""
    return 10 ** (np.asarray(db) / 20)


def rms(x):
    """Root mean square."""
    return np.sqrt(np.mean(x ** 2) + 1e-20)


def scene():
    """The spill, the box, the search and the workshop around them."""
    spill = wrenches() + tools_in_box() + heap() + lip_knocks() + screwdriver()
    box = box_body() + dropped_spanner()
    search = rummaging() + slim_spanner() + held_spanner() + nut_taps()
    return spill + box + search + shifting() + workshop()


KNEE, EDGE_HZ = .7, 15900


def record(dry):
    """Rounds off peaks above a knee, then limits the band from above."""
    below = np.clip(dry, -KNEE, KNEE)
    rounded = below + .2 * np.tanh((dry - below) / .2)
    low_pass = signal.firwin(255, EDGE_HZ, window=("kaiser", 8), fs=SR)
    return signal.oaconvolve(rounded, low_pass[None], "same")


dry = scene()
out = record(dry)
unload_wav(out)
```